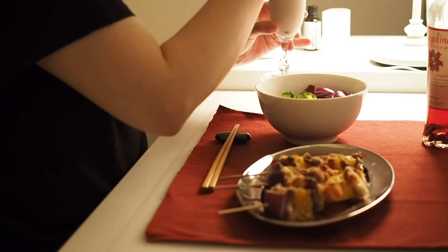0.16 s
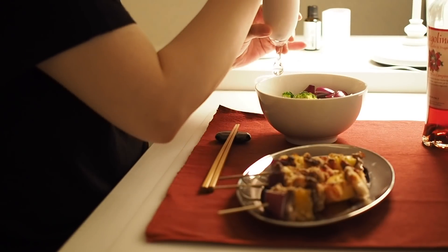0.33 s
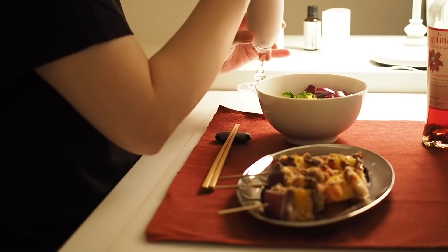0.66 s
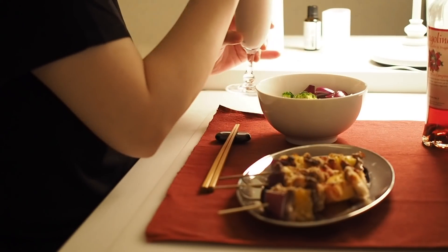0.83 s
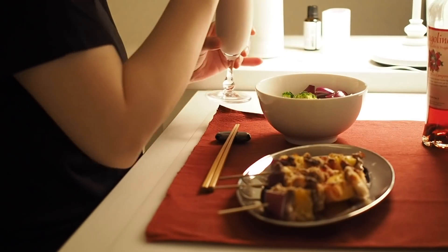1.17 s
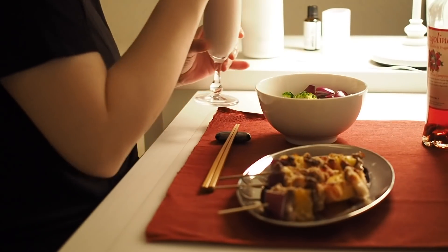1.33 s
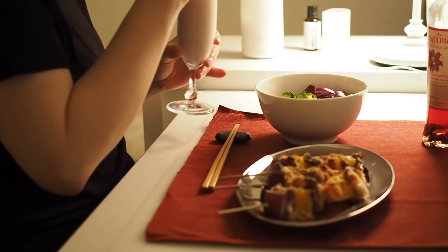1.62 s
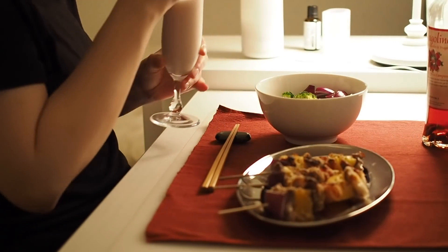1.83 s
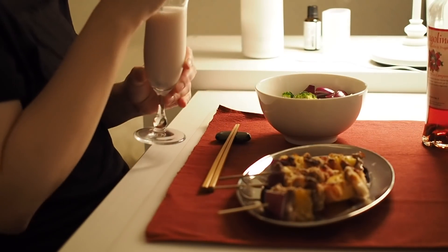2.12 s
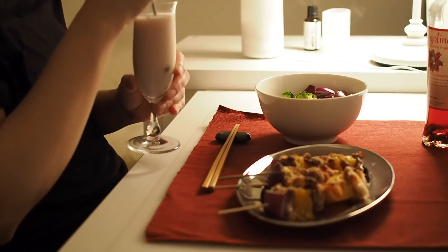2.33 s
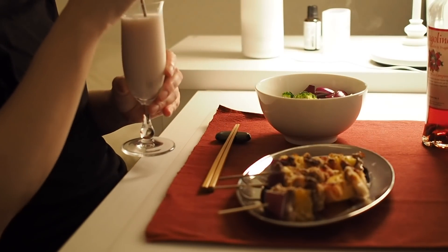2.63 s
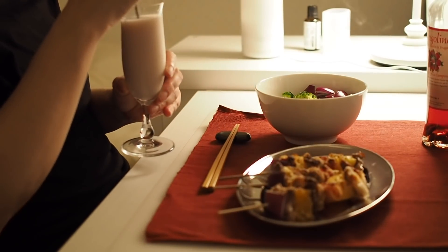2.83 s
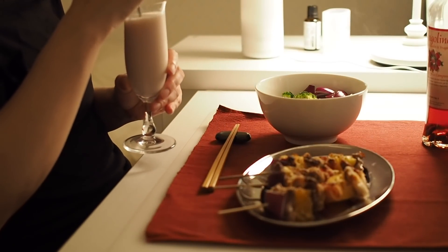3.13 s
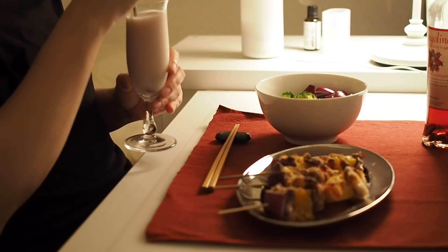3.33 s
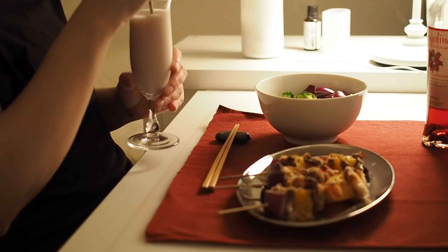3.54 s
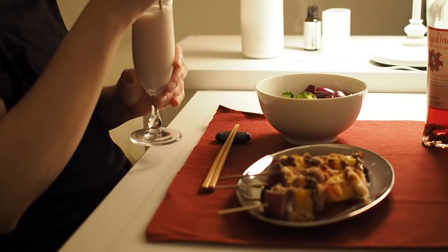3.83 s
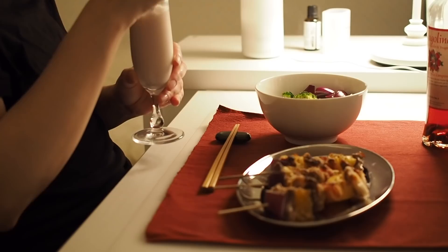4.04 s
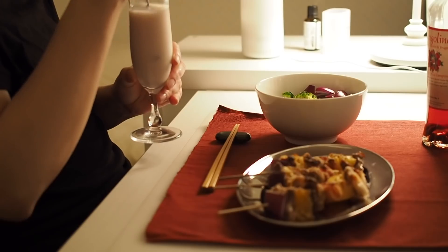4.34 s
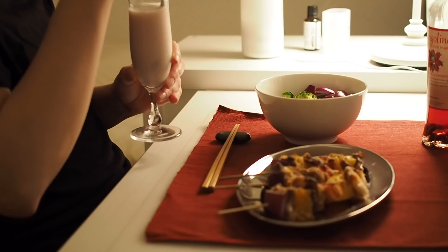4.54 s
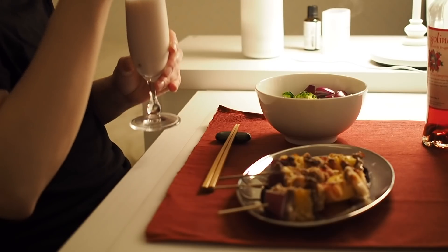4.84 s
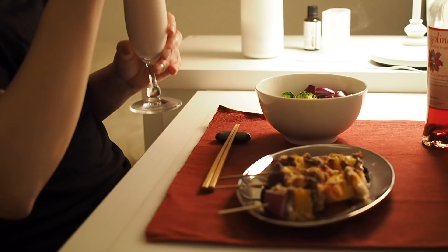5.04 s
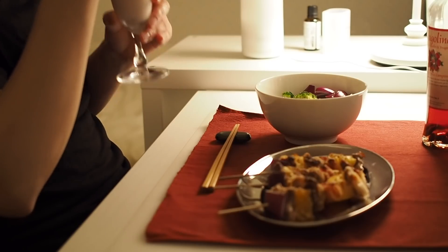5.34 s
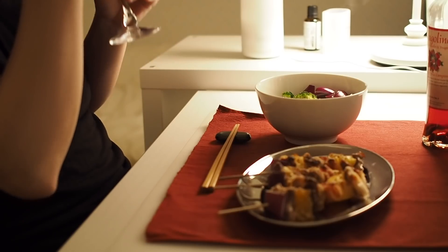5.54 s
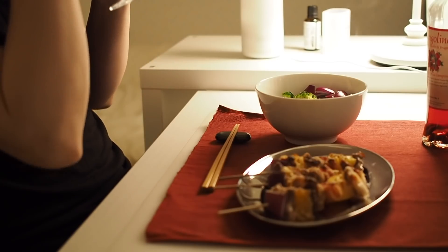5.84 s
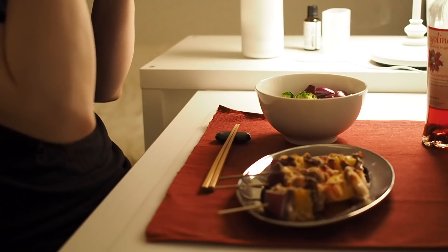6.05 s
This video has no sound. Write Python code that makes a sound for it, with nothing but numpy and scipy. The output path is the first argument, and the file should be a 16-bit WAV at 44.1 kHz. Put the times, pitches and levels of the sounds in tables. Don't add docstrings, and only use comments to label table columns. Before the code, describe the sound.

A quiet small room, close stereo microphone, steady soft hiss and a very faint low drone that swells and wavers far away. A long spoon stirs a thick drink in a stemmed glass. A faint clink at 0.3 s, a soft slide around 0.6, a light tap at 0.9. A quick cluster of brighter clinks at 1.3, a hard, clear one at 1.56, medium taps at 1.9 and 2.2. From 2.35 to 3.7 mostly delicate touches and faint glassy rubbing, with a thin high singing tone near 2.6 and stronger slides at 3.1 and 3.6. The sharpest, loudest clink strikes at 3.85 with an immediate rebound, its thin high ring lingering. Soft slides and tiny touches follow to 4.4, then single lighter taps at 4.67 and 5.65. At 6.1 the spoon lightly grazes the rim, a small bright clink cut near the end.

```python
import sys
import numpy as np
from scipy import signal
from scipy.fft import rfft, irfft
from scipy.io import wavfile
from scipy.ndimage import uniform_filter1d

SR = 44100
rng = np.random.default_rng(int(sys.argv[2]) if len(sys.argv) > 2 else 0)


def unload_wav(signal):
    wavfile.write(
        sys.argv[1],
        SR,
        np.round(np.clip(np.atleast_2d(signal).T, -1, 1) * 32767).astype(np.int16),
    )


def nominal_scale(level):
    x = np.asarray(level, float) / 20
    return 10 ** x


N = 272538

BOWL_HZ = [1010, 2600, 3391, 3419, 3542, 3562, 4285, 4320, 4350, 4448, 4612, 4636, 4812, 5132]
BOWL_T60 = [0.16, 0.65, 0.33, 0.5, 0.2, 0.19, 0.068, 0.27, 0.22, 0.22, 0.36, 0.25, 0.3, 0.11]
# bowl, wall, spoon modes [level_db]
SPOTS_LATE = [(-39, -9, 9, -3, -25, -33, -10, -10, -31, -30, -2, -13, -12, -21, -8, -14, -15, -9, 1, -26, -10, -7, -4, -18, -4, -24, -15, -28, -12, -24, -18, -17, -21, -28, -16, -24, -38, -21, -27, -26),
              (-17, -9, -10.5, -15, -10.5, -16, 0.5, 1, -24, -16, -2.5, -19, -40, -43, -31, -39, -31, -16, -14, -33, -26, -30, -33, -38, -35, -35, -15, -16, -20, -16, -27, -28, -40, -18, -21, -16, -27, -36, -37, -40),
              (-13.5, -27, -5, -15, -30, -12, -11, -1, -25, -20, -4, -0.5, -36, -37, -21, -10, -40, -40, -1, -16, 2, -6, -31, -25, -32, -16, -33, -31, -20, -18, -16, -11, -25, -40, -36, -37, -15, -27, -40, -25),
              (-35, -26, 2, -5.5, -7.5, 4, -22, -32, -31, -20, -14, -36, -30, -33, -13.5, -27, -17, -40, -23, -33, -6, -17, -32, -35, -31, -40, -26, -27, -20, -22, -28, -35, -29, -30, -35, -31, -30, -34, -40, -34),
              (-35, -32, 2, -12, -35, -10, 1, 7, -20, -16, -5.5, -19, -31, -33, -22, -20, -31, -20, -13, -21, -3, -5, -11, -32, -24, -13, -16, -27, -26, -31, -23, -26, -13, -27, -31, -26, -33, -31, -35, -35)]
# pitch_hz, spread_radians
SPREAD = [(1000, .1), (3400, 0.07), (5500, 0.5), (9000, 0.85), (14000, 1.2)]


def evened(x):
    return x / np.sqrt(np.mean(x ** 2) + 1e-20)


def read(points, hz):
    f, value = np.transpose(points)
    return np.interp(np.log(hz + 1), np.log(f + 1), value)


def add(mix, start_s, sound):
    part = mix[:, round(start_s * SR):][:, :sound.shape[-1]]
    part += sound[..., :part.shape[1]]


def bell(middle_s, half_s):
    t = np.arange(N) / SR
    return np.exp(-.5 * ((t - middle_s[:, None]) / half_s[:, None]) ** 2)


def bank(hz, t60):
    t = np.arange(int(.4 * SR)) / SR
    fade = nominal_scale(-60 * t / np.clip(t60, .02, 1)[:, None])
    fade /= np.sqrt((fade[:, :3087] ** 2).mean(1, keepdims=True))
    return fade * np.exp(2j * np.pi * hz[:, None] * t)


def hiss():
    # pitch_hz, level_db (per Hz)
    colour = [(20, -27), (32, -30), (48, 4.5), (65, 7), (110, 1), (200, 2.5), (350, -1), (520, 0),
              (700, -6), (1000, -5), (1500, -10.5), (2300, -15.5), (3800, -18.5), (7000, -21), (15500, -27)]
    # pitch_hz, likeness (0 to 1)
    likeness = [(60, 0.64), (130, 0.45), (290, 0.84), (640, 0.76), (1410, 0.68), (3100, 0.19),
                (6820, 0.014), (15000, 0.01)]
    level_db, edge_hz = -58.5, 15750
    frames, hz = N // 512 + 5, np.fft.rfftfreq(2048, 1 / SR)
    a, b, c, d, patches = rng.standard_normal((frames, 1025, 5)).T
    patches = evened(uniform_filter1d(uniform_filter1d(patches, 20, 0), 10, 1))
    same = np.clip(read(likeness, hz), -1, 1)[:, None]
    left = a + 1j * b
    right = same * left + np.sqrt(1 - same ** 2) * (c + 1j * d)
    z = np.array([left, right])
    z *= nominal_scale(read(colour, hz)[:, None] + 0.37 * patches) * (hz < edge_hz)[:, None]
    return nominal_scale(level_db) * evened(signal.istft(z, nperseg=2048, noverlap=1536)[1][:, :N])


def drone():
    # middle_s, half_length_s, level_db, pitch_hz
    swells = [(0.06, 0.26, -68, 83.4), (0.343, 0.089, -65, 224), (0.717, 0.06, -80, 75),
              (1.01, 0.075, -66.5, 79.4), (1.35, 0.16, -79, 76.7), (2.364, 0.16, -65, 79.5),
              (2.73, 0.12, -61.5, 80.1), (3.215, 0.076, -64, 81.3), (3.702, 0.25, -72.5, 79.9),
              (4.28, 0.095, -60, 82.5), (4.55, 0.066, -65, 82), (4.822, 0.074, -60, 83.5),
              (5.253, 0.096, -58.5, 81.5), (5.504, 0.067, -62.5, 79.5), (5.7, 0.16, -63.5, 79.7),
              (5.936, 0.12, -63, 76)]
    middle, half, db, hz = np.transpose(swells)
    turns = np.outer(hz, np.arange(N) / SR) + rng.random(len(hz))[:, None]
    slow = uniform_filter1d(uniform_filter1d(rng.standard_normal(N), 3000), 3000)
    waver = 1 + 0.11 * evened(slow)
    return waver * np.sqrt(2) * (nominal_scale(db) @ (bell(middle, half) * np.sin(2 * np.pi * turns)))


def room(x):
    # pitch_hz, t60_s
    room_t60 = [(1000, 0.21), (3500, 0.37), (7000, 0.29), (12000, 0.17), (16000, 0.19)]
    # delay_s, left_db, right_db
    echoes = [
        (.004, -43, -17),
        (.009, -16, -1.5),
        (.0185, -44, -30),
        (.027, -56, -13),
    ]
    tail_db = -6.5
    sparse = np.zeros((2, SR // 2))
    at = np.arange(100, SR // 2 - 20, 20) + rng.integers(0, 20, (2, (SR // 2 - 101) // 20))
    np.put_along_axis(sparse, at, rng.choice([-1., 1.], at.shape), 1)
    hz, t, z = signal.stft(sparse, SR, nperseg=128)
    tail = signal.istft(z * nominal_scale(-60 * t / read(room_t60, hz)[:, None]), SR, nperseg=128)[1]
    tail *= nominal_scale(tail_db) / np.linalg.norm(tail[0])
    tail[1] = .92 * tail[0] + .36 * tail[1]
    for delay_s, *db in echoes:
        tail[:, round(delay_s * SR)] += nominal_scale(np.array(db))
    return signal.fftconvolve(x[None], tail, axes=1)[:, :N]


def rub():
    # middle_s, half_length_s, level_db
    strokes = [
        (.58, .17, -69),
        (2.443, 0.06, -74),
        (2.682, 0.15, -74),
        (3.11, 0.085, -61.5),
        (3.578, 0.092, -64.5),
        (3.75, .07, -101),
        (4.103, 0.13, -64),
        (4.325, 0.13, -70),
    ]
    middle, half, db = np.transpose(strokes)
    slips = rng.standard_normal(N) * (rng.random(N) < 200 / SR)
    gain = nominal_scale(np.array(SPOTS_LATE[3][:len(BOWL_HZ)]))
    body = (gain @ bank(np.array(BOWL_HZ), np.array(BOWL_T60))).imag
    drive = nominal_scale(db) @ bell(middle, half) * evened(slips)
    return signal.fftconvolve(drive, body / np.linalg.norm(body))[:N]


def singing():
    # middle_s, half_length_s, level_db, pitch_hz
    tones = [
        (2.46, .03, -79, 4320),
        (2.55, .04, -79, 4320),
        (2.625, .028, -69, 4322),
        (2.49, .04, -75, 3391),
        (1.06, .035, -79, 3400),
        (.72, .04, -82, 3542),
    ]
    middle, half, db, hz = np.transpose(tones)
    waves = np.sin(2 * np.pi * np.outer(hz, np.arange(N) / SR))
    return nominal_scale(db) @ (bell(middle, half) * waves) * np.sqrt(2)


def stem():
    # start_s, level_db
    stem_taps = [
        (.346, -73),
        (1.312, -64),
        (1.562, -62),
        (1.906, -65),
        (2.094, -77),
        (2.226, -78),
        (3.851, -59),
    ]
    stem_hz, stem_t60 = 4497, .9
    out = np.zeros((1, N))
    mode = np.sqrt(2) * bank(np.array([stem_hz]), np.array([stem_t60])).imag
    for s, db in stem_taps:
        add(out, s, nominal_scale(db) * mode)
    return out


def ring(modes, hz, gain, rise):
    phase, side = rng.random((2, len(hz)))
    lead = np.outer([1, -1], read(SPREAD, hz) * (side - .5) * 2)
    sound = (gain * np.exp(1j * (2 * np.pi * phase + lead)) @ modes).imag
    return sound * (1 - np.exp(-np.arange(modes.shape[1]) / SR / rise))


def crack(db, rise, mode_hz, gain):
    # pitch_hz, level_db (per Hz)
    colour = [(500, -10), (1000, -5.5), (2000, -3), (2600, -4), (2980, -6), (3400, -4), (3980, -17),
              (4300, -10.5), (4900, -5), (5600, -11), (6050, -16), (6600, -6.5), (8000, -8), (11000, -4.5),
              (15200, -7), (17000, -41)]
    skirt_hz, valley_db = 80, -18
    thicket_db, thicket_bins = 7, 7
    splash_t60, tick_db, tick_t60 = 0.14, 1.5, 0.011
    t, hz = np.arange(8192) / SR, np.fft.rfftfreq(8192, 1 / SR)
    skirts = (gain / gain.max()) ** 0.71 @ (1 / (1 + ((hz - mode_hz[:, None]) / skirt_hz) ** 2))
    mid, side = rfft(rng.standard_normal((2, 8192))) * nominal_scale(read(colour, hz)) * (skirts + nominal_scale(valley_db))
    lumps = evened(uniform_filter1d(rng.standard_normal(len(hz)), size=thicket_bins))
    mid, side = [mid, side] * nominal_scale(thicket_db * lumps * np.minimum(hz / hz.mean() * 2, 1))
    side *= np.tan(np.clip(.5 * read(SPREAD, hz), 0, .78))
    noise = evened(irfft([mid + side, mid - side]))
    fade = nominal_scale(-60 * t / splash_t60) + nominal_scale(tick_db - 60 * t / tick_t60)
    return nominal_scale(db) * noise * fade * (1 - np.exp(-t / rise))


def rim_tap():
    # pitch_hz, level_db, t60_s
    rim_modes = [(2010, -20, .3), (2697, -14, 0.33), (3413, -9, 0.81), (4020, -8, 0.18), (4540, -7, 0.6),
                 (4680, -7, 0.18), (5430, -4, .05), (5730, -9, .8), (6869, -4, 0.056), (7192, -17, 0.2),
                 (7670, -13, 0.17), (8280, -2.5, 0.091), (9300, 2, 0.069), (12770, -11, 0.11)]
    start_s, db, turn_hz = 6.1045, -52, 6000
    hz, mode_db, t60 = np.transpose(rim_modes)
    rings, splashes = out = np.zeros((2, 2, N))
    for rise_s, part in zip((.009, .0015), (hz < turn_hz, hz >= turn_hz)):
        modes = bank(hz[part], t60[part])
        add(rings, start_s, ring(modes, hz[part], nominal_scale(db + mode_db[part]), rise_s))
    add(splashes, start_s, crack(db + 10.5, 0.0042, hz, nominal_scale(mode_db)))
    return out


def hard_blows():
    # start_s, level_db
    blows = [
        (1.5606, -49.5),
        (3.849, -41),
        (3.867, -46.5),
        (4.0372, -73),
    ]
    # pitch_hz, level_db, t60_s
    cluster = [(4430, -7, .25), (4550, -5, 0.36), (4920, -12, .06), (4950, -13, .05), (4780, -10, 0.15),
               (4920, -1, .1), (5010, 1, 0.023), (5300, -13, 0.06), (5230, -18, .04), (5190, -6, 0.05)]
    hz, mode_db, t60 = np.transpose(cluster)
    out = np.zeros((2, N))
    for s, db in blows:
        add(out, s, ring(bank(hz, t60), hz, nominal_scale(db + mode_db), 0.00037))
    return out


def taps():
    # start_s, blow_db, splash_db
    spot_taps = [
        [(0.3442, -67, -60)],
        [(0.894, -55.5, -58.5)],
        [(1.3035, -58, -47), (1.311, -56, -46.5), (1.329, -50.5, -47.5)],
        [(0, -76, -100), (1.5603, -42.5, -41)],
        [(1.905, -52, -50), (2.875, -82.5, -89), (3.739, -84, -83)],
        [(2.0924, -79, -57.5)],
        [(2.223, -59.5, -49.5)],
        [(2.566, -72.5, -62)],
        [(0.2175, -91, -79), (3.5275, -73, -61)],
        [(3.849, -46, -33.5), (3.867, -53.5, -39)],
        [(4.037, -79, -65.5)],
        [(4.6652, -57.5, -50.5)],
        [(5.654, -57.5, -51.5)],
        [(2.355, -82, -69), (2.45, -79.5, -85), (2.468, -74.5, -90), (2.51, -78, -90), (2.77, -76, -87),
         (2.797, -77, -78), (3.04, -76, -68), (3.352, -70.5, -83), (3.62, -81, -69), (3.69, -78, -83),
         (4.24, -83, -63), (4.29, -82, -72), (4.36, -83, -88)],
        [(2.6, -84, -90), (3.148, -84, -68), (3.195, -90, -88), (4.168, -70.5, -72), (4.185, -71, -86)],
    ]
    contact_s = [0.003, 0.0031, 0.00043, 0.00049, 0.0025, 0.00058, 0.0021, 0.0009, 0.0018, 0.00021, .0008,
                 0.00072, 0.0061, 0.017, 0.015]
    damping = [1, 0.9, 0.97, 1, 0.75, .98, 0.9, 0.83, 0.99, 0.72, 0.62, 0.66, 1, 0.92, 0.53]
    # pitch_hz, then t60_s
    wall_hz = [5550, 5585, 6440, 6505, 7065, 7644, 7696, 7725, 7815, 8095, 8125, 8565, 8612, 8990]
    spoon_hz = [9660, 9690, 10380, 10430, 10670, 11253, 12290, 12365, 13440, 13525, 14660, 14933]
    wall_t60 = [0.32, 0.3, 0.1, 0.29, 0.17, 0.21, 0.04, 0.11, 0.37, 0.17, 0.33, 0.092, 0.23, 0.13]
    spoon_t60 = [0.16, 0.26, 0.32, 0.093, 0.075, 0.27, 0.28, 0.13, 0.13, 0.093, 0.14, 0.091]
    # bowl, wall, spoon modes
    # [level_db]
    spots_first = [(-35, -33, -17, -2, 7, 1, -26, -6, -29, -20, -1, -18, -33, -28, -3.5, -29, -40, -29, -11, -38, -11, -8, -34, -16, -28, -36, -28, -39, -24, -20, -39, -26, -3.5, -40, -40, -26, -40, -35, -12, -24),
                   (-41, -28, -20, -17, -30, -40, -42, -17.5, -36, -40, -11.5, -30, -40, -38, -30, -40, -40, -28, 1, -27, -15, -24, -33, -24, -31, -29, -11, -23, -23, -9.5, -38, -33, -15, -28, -28, -13, -27, -22, -27, -15),
                   (-43, -16, -0.5, -3, -3, -7, -25, -5, -28, -21, -15, -16, -42, -40, 2.5, -23, -42, -34, -8, -10, -11, -8, -23, -17, -24, -40, -13, -8, -5, -9, -27, -39, -29, -41, -32, -31, -40, -27, -24, -40),
                   (-30, -28, 1, -6, -30, -14, -20, -27, -14, -16, -9, -14, -38, -21, -27, -28, -38, -14.5, -16, -32, -20, -20, -16, -12, -30, -14, -11.5, -15, -19, -24, -21, -27, -17, -23, -24, -15, -14, -11, -31, -15),
                   (-39, -29, -12, -11, -2.5, -19, -35, -20, -30, -24, -29, -39, -39, -40, -8.5, -19, -51, -38, -36, -17, -2, -1.5, -28, -28, -27, -39, -33, -34, -24, -22, -42, -43, -35, -38, -40, -37, -26, -24, -23, -40),
                   (-35, -8, -10, -24, 7, -16, -11, 7, -23, -17, -9, 0, -37, -35, -30, -40, -26, -2, 2, -10, 5, 7, -30, -8, -16, -40, -37, -1, -6, -15, -21, -23, -4, -32, -13, 8, -18, -8, -10, -1),
                    (-27, -29, -8, -1.5, -6, -16, -29, -7.5, -19, -28, -39, -35, -44, -40, 1.5, -20, -40, -33, -17, -29, 0, 3, -32, -13, -22, -40, -20, -10, -28, -31, -20, -31, -14, -42, -42, -43, -14, -23, -28, -11),
                    (-35, -19, -1, -3, -9, -8, -31, -3, -18, -21, -20, -19, -34, -39, -14, -20, -28, -14, -7, -15, 2, 5, -15, -27, -26, -31, -23, -30, -22, -14, -14, -15, -7, -40, -31, -35, -21, -28, -5, -5),
                    (-35, -14, -7, -3, 4, 0, -15, -12.5, -23, -28, 0.5, -19, -28, -18, -18, -31, -19, -15, 5.5, -36, -24, -20, -26, -23, -30, -25, -3, -9, -10, -9, -10, -36, -2, -24, -1.5, -6, -14, -13, -13, 1),
                    (-22, -28, -6, -0.5, -26, -11.5, -11, -1.5, -2.5, -14, -28, -30, -9, -9, -15, -25, -7, -11, -13, -29, -4, -10, -1, -7, -7, -16, -1, -16, -23, -6, -8, -15, -21, -8.5, -15, -16, -10, -26, -10, -8)]
    hz = np.array(BOWL_HZ + wall_hz + spoon_hz)
    t60 = np.array(BOWL_T60 + wall_t60 + spoon_t60)
    spots = spots_first + SPOTS_LATE
    rings, splashes = np.zeros((2, 2, N))
    for mode_db, damp, rise, blows in zip(spots, damping, contact_s, spot_taps):
        modes = bank(hz, damp * t60)
        for s, blow_db, splash_db in blows:
            gain = nominal_scale(np.array(mode_db) + blow_db)
            add(rings, s, ring(modes, hz, gain, rise))
            add(splashes, s, crack(splash_db - 4.0, .5 * rise, hz, gain))
    return np.array([rings, splashes])


def scene():
    rings, splashes = nominal_scale(7.0) * taps() + nominal_scale(-4.5) * rim_tap()
    rings = rings + nominal_scale(-12.0) * rub() + hard_blows() + singing() + stem()
    to_room = splashes + nominal_scale(-9) * rings
    return rings + splashes + room(to_room.mean(0)) + hiss() + drone()


def roll_off(x):
    return signal.sosfilt(signal.butter(12, 17140, fs=SR, output="sos"), x)


def record(dry):
    edge_hz, offset = 16900, -.0007
    lowpass = signal.firwin(255, edge_hz, window=("kaiser", 9), fs=SR)
    limited = signal.oaconvolve(dry, lowpass[None], "same")
    return roll_off(limited + offset)


dry = scene()
out = record(dry)
unload_wav(out)
```